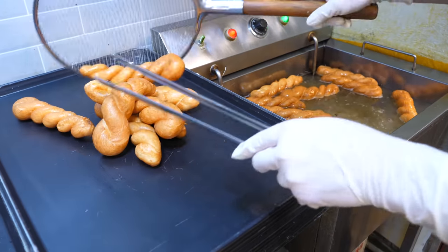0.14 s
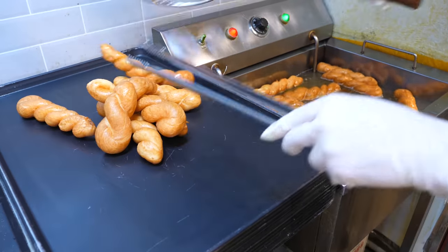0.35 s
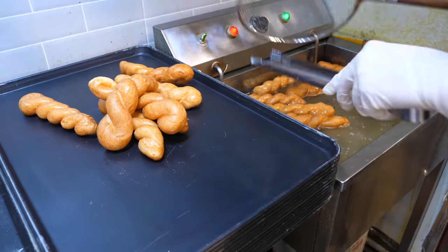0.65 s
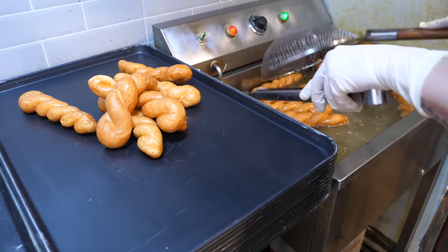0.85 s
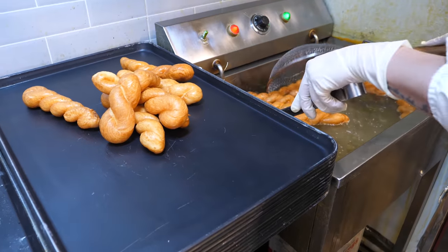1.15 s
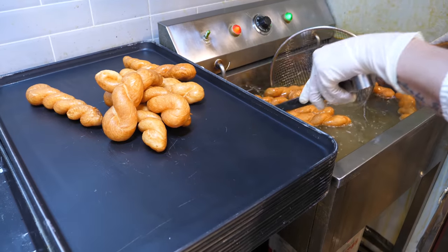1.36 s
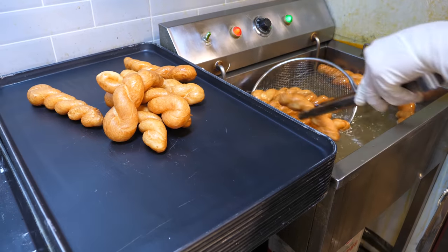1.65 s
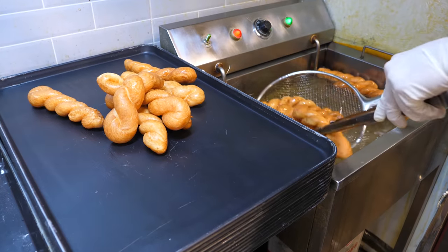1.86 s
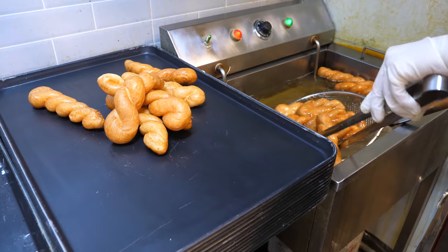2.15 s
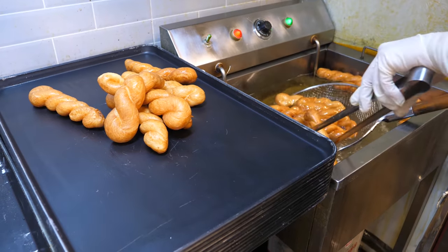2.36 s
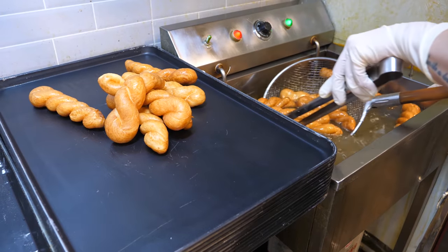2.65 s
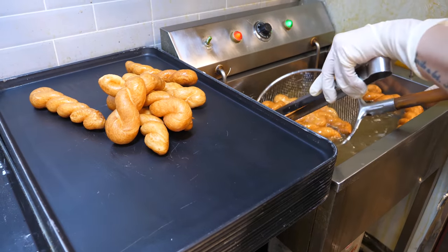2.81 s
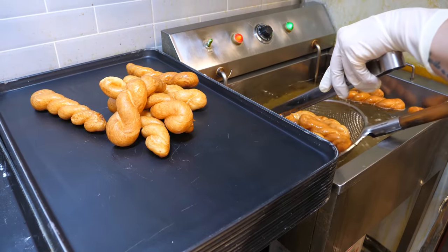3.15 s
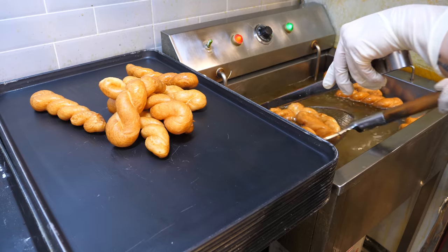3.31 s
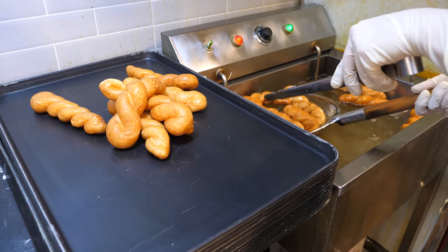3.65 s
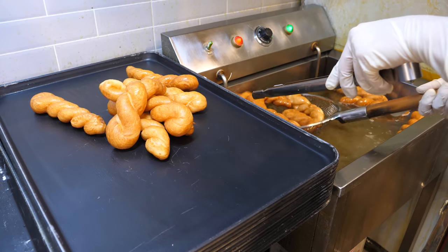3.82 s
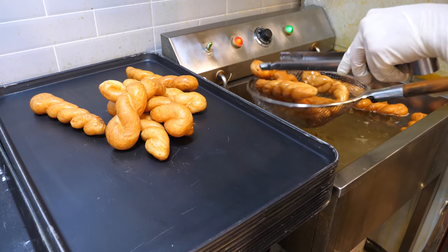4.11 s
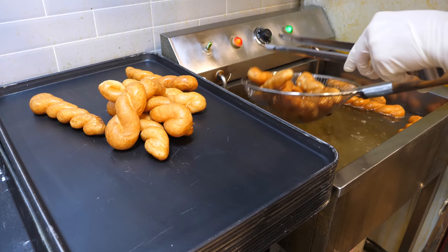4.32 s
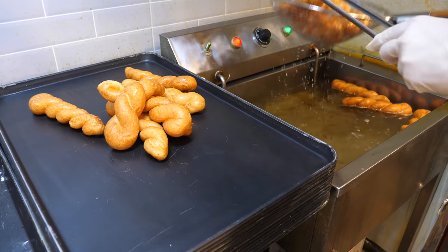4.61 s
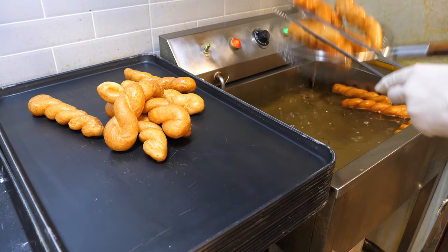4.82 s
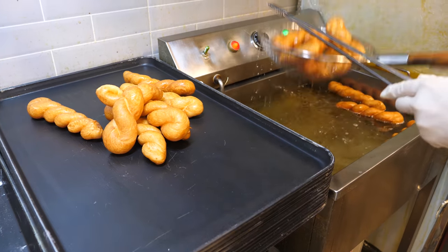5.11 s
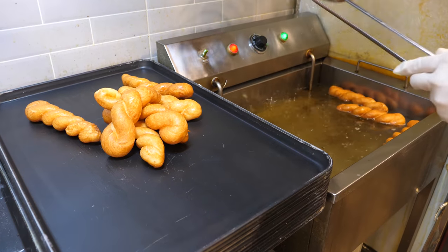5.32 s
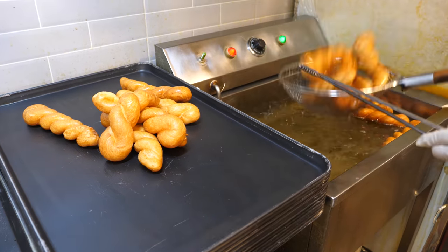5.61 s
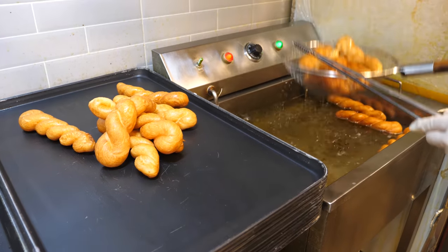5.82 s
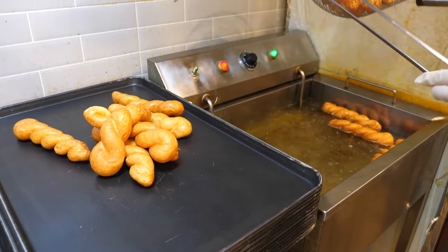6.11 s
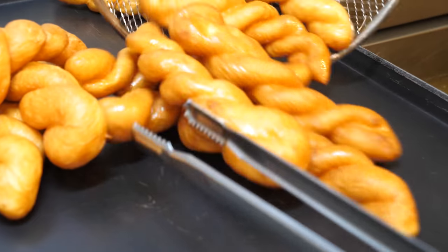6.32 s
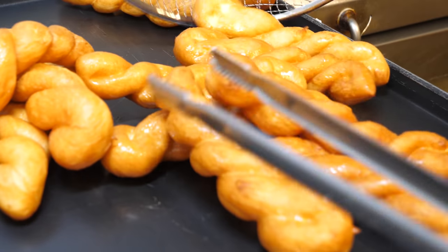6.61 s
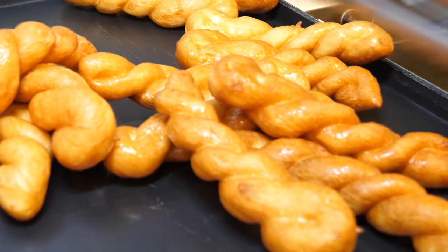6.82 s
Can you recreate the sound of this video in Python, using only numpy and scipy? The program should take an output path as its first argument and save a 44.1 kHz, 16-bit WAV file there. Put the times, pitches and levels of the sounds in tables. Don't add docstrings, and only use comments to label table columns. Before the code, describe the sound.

Close in a small tiled kitchen, an extractor fan hums, whines and rattles while its draught thumps the microphone, most violently just after one second. A wire strainer knocks trays, then scrapes and rings against a steel fryer as dough is scooped. Tongs clink sharply, dough rustles when tossed, then tips onto a tray with quick thuds in a closer shot.

```python
import sys
import numpy as np
from scipy import signal
from scipy.fft import rfft, irfft, next_fast_len
from scipy.io import wavfile
from scipy.ndimage import uniform_filter1d, map_coordinates

SR = 44100
rng = np.random.default_rng(int(sys.argv[2]) if len(sys.argv) > 2 else 0)


def digitize_waveform(pressure):
    field = np.atleast_2d(pressure).T
    bounded = np.clip(field, -1, 1)
    quanta = np.round(bounded * 32767).astype(np.int16)
    wavfile.write(sys.argv[1], SR, quanta)


def to_linear_factor(level_db):
    exponent = np.asarray(level_db, float) / 20
    return 10 ** exponent


N = 306936
EDIT_S = 6.2232


def unit(x):
    return x / np.sqrt(np.mean(x ** 2) + 1e-20)


def along(points, hz):
    f, v = np.transpose(points)
    return np.interp(np.log(hz + 1), np.log(f + 1), v)


def curves(rows):
    s, *cols = np.transpose(rows)
    return [np.interp(np.arange(N) / SR, s, c) for c in cols]


def swells(rows):
    t = np.arange(N) / SR
    power = 0
    for s, rise_s, fall_s, db in rows:
        power = power + to_linear_factor(2 * db) * np.exp(-((t - s) / np.where(t < s, rise_s, fall_s)) ** 2)
    return np.sqrt(power)


def wobble(rate_hz, size=N):
    knots = rng.standard_normal(int(size * rate_hz / SR) + 4)
    return map_coordinates(knots, [np.arange(size) * rate_hz / SR])


def filtered(x, response):
    m = next_fast_len(N + SR // 2)
    return unit(irfft(rfft(x, m) * response(np.fft.rfftfreq(m, 1 / SR)), m)[:N])


def noise(response):
    return filtered(rng.standard_normal(N), response)


def colour(points):
    return lambda hz: to_linear_factor(along(points, hz))


def resonant(peaks):
    def response(f):
        total = 0
        for k, (c, w, db) in enumerate(peaks):
            total = total + (-1) ** k * to_linear_factor(db) * 1j * f * w / (c * c - f * f + 1j * f * w)
        return total
    return response


def grit(rate_hz, spread_db):
    touch = rng.random(N) < rate_hz / SR
    size = to_linear_factor(spread_db * np.minimum(rng.exponential(size=N), 3))
    return rng.standard_normal(N) * (0.18 + touch * size)


def strike(spectrum, modes, t60_s, ring_db, soften, chatter_db, crack_db, attack_s, dull_hz=9000):
    t = np.arange(SR // 2) / SR
    hz, frame_s, z = signal.stft(rng.standard_normal(len(t)), SR, nperseg=128)
    life_s = t60_s * (np.maximum(hz, 300) / 1000) ** -soften / (1 + (hz / dull_hz) ** 2)
    fade = to_linear_factor(-60 * frame_s / life_s[:, None]) + to_linear_factor(crack_db - 60 * frame_s / 0.0072)
    z = z * fade * to_linear_factor(along(spectrum, hz))[:, None]
    clatter = signal.istft(z, SR, nperseg=128)[1][:len(t)]
    clatter = clatter / np.sqrt(np.mean(clatter[:400] ** 2))
    ring = 0
    for k, (mode_hz, db, mode_t60_s) in enumerate(modes):
        level_db = db - 60 * t / mode_t60_s + chatter_db * wobble(119.5, size=len(t))
        ring = ring + (-1) ** k * to_linear_factor(level_db) * np.sin(2 * np.pi * mode_hz * t)
    return (clatter + to_linear_factor(ring_db) * ring) * (1 - np.exp(-t / attack_s)) / 3


def whine(turns, orders, levels_db, shade_db):
    throb_db = 3.0 * np.cos(2 * np.pi * (turns - .25))
    total = 0
    for k, db in zip(orders, levels_db):
        level_db = db + 2.5 + shade_db(k) + throb_db * (130 < k < 300) + 1.96 * wobble(2.64)
        total = total + to_linear_factor(level_db) * np.cos(2 * np.pi * (k * turns + .19 * k ** 2))
    return total


def fan():
    # (time [s], fan rush level [dB])
    rush_gain = [(0.0, -41), (0.27, -46), (1.01, -40.5), (1.2, -48.5), (1.43, -45), (1.66, -41.5),
                 (2.11, -40.5), (2.29, -42), (2.54, -47), (2.77, -48), (3.31, -40.5), (3.51, -44),
                 (3.68, -43), (4.9, -34.5), (5.14, -37.5), (5.72, -38.5), (6.75, -35), (6.96, -34)]
    # (time [s], speed [turns/s])
    shaft_speed = [(0, 22.07), (.65, 22.03), (1.05, 22.0), (1.85, 21.966), (3.05, 21.962), (3.85, 21.935),
                   (4.65, 21.936), (5.05, 21.963), (6.22, 22.0), (6.23, 22.128)]
    # (frequency [Hz], level [dB/Hz])
    rush_spectrum = [(24, -29), (40, -2), (127, 0), (275, -10.5), (1370, -22), (1610, -26), (1800, -22),
                     (2020, -28), (2900, -27.5), (3720, -31), (5110, -30), (5850, -34), (9000, -50),
                     (11700, -52), (19800, -120)]
    # (frequency [Hz], width [Hz], level [dB])
    housing = [(57, 8.2, -5), (120.9, 7.7, 3.5), (175, 5.7, -1.5), (243.7, 14.7, -9)]
    # (frequency [Hz], width [Hz], level [dB])
    cage = [(1130, 110, -14), (1310, 63, -5.5), (1780, 120, 0), (2447, 92, 2.5), (2866, 210, 0.5),
            (3450, 310, -4.5), (3900, 130, -4), (4540, 380, -2.5), (5400, 88, -4.5), (5850, 390, -17.5),
            (7160, 450, -9)]
    # (frequency [Hz], level [dB/Hz])
    hiss_spectrum = [(6300, -22), (7200, 1), (7800, 5), (8500, 5.5), (9300, -0.5), (12000, -2),
                     (14200, -3.5), (16000, -9)]
    # (time [s], 80th order level [dB], level of orders above 200 [dB])
    arm_shade = [(0, 0, -7), (1, 1, 0), (2.5, 3, 0.5), (4.9, -3, 2), (5.15, 7.5, 0.5), (6.2, 6.5, 0)]
    far_orders = [8, 32, 48, 61, 78, 79, 80, 81, 83, 84, 100, 111, 112, 128, 131, 132, 133, 134, 135, 136,
                  144, 152, 160, 180, 212, 228, 232, 235, 236, 237, 238, 330]
    far_levels = [-44, -54.5, -52, -56.5, -61, -61, -54, -59, -54.5, -62, -55.5, -60, -58, -67, -59.5,
                  -50.5, -54.5, -63, -64, -63, -60, -60, -70, -61, -70, -68, -62, -60, -56.5, -70, -55.5,
                  -66]
    near_orders = [8, 58, 80, 81, 82, 111, 112, 125, 128, 132, 144, 196, 212, 234, 236, 237, 238, 330]
    near_levels = [-52, -47, -55, -51, -61, -45, -41.5, -55, -48, -40, -63, -53, -65, -52, -51, -57, -63,
                   -66]
    # (time [s], level [dB])
    near_rise = [(6.22, -12), (6.26, -12), (6.45, -2), (6.7, -2.5)]

    rush_db = curves(rush_gain)[0] - 3
    duck_db = rush_db + 44
    hum_db = -35.5 + 0.97 * duck_db + 1.66 * wobble(3.54)
    hiss_db = -54.5 + 0.99 * duck_db

    near = np.arange(N) > EDIT_S * SR
    turns = np.cumsum(curves(shaft_speed)[0]) / SR
    turns -= np.where(near, turns[round(6.617 * SR)], turns[round(4.304 * SR)])

    steps = np.arange(2048)
    patterns = rng.standard_normal((3, len(steps))) * to_linear_factor(-7 * steps / len(steps))
    rattle = 0
    for pattern in patterns:
        rattle = rattle + to_linear_factor(2.0 * wobble(1.185)) * np.interp(turns % 1 * len(steps), steps, pattern)
    rattle = filtered(rattle, resonant(cage))

    low_db, high_db = curves(arm_shade)

    def shade_db(k):
        if k == 80:
            return low_db
        return high_db if k > 200 else 0

    far_whine = whine(turns, far_orders, far_levels, shade_db)
    near_whine = whine(turns, near_orders, near_levels, lambda k: 0)
    near_whine = near_whine * to_linear_factor(curves(near_rise)[0] - 2.0)
    whines = to_linear_factor(42.5) * np.where(near, near_whine, far_whine)

    rush = to_linear_factor(12.5 + 0.2 * wobble(6.2)) * noise(colour(rush_spectrum))
    hum = noise(resonant(housing)) + 0.5 * np.sin(2 * np.pi * 140.0 * np.arange(N) / SR)
    air = to_linear_factor(rush_db) * (rush + to_linear_factor(-1.0) * rattle + whines)
    return air + to_linear_factor(hum_db) * hum + to_linear_factor(hiss_db) * noise(colour(hiss_spectrum))


def draught():
    # (frequency [Hz], level [dB/Hz])
    push_spectrum = [(1, 4.5), (4, 20.5), (16, 10.5), (26, -3), (50, -49), (200, -130)]
    # (frequency [Hz], level [dB/Hz])
    flutter_spectrum = [(10, -9), (22, -0.5), (55, -8.5), (92, -22.5), (200, -34), (600, -130)]
    # (peak [s], rise [s], fall [s], push level [dB], flutter above it [dB])
    gusts = [(0.02, 0.04, 0.036, -14, -6.5), (0.16, 0.026, 0.097, -10, -3.5), (0.6, 0.18, 0.36, -17.5, -21),
             (1.17, 0.047, 0.082, 5.5, -11.5), (1.4, 0.11, 0.082, -8.5, -15),
             (1.68, 0.11, 0.061, -15.5, -26), (1.86, 0.041, 0.034, -11, -11), (1.97, 0.035, 0.015, -5, -25),
             (2.35, 0.034, 0.05, -0.5, -19), (2.57, 0.083, 0.056, -3.5, -8), (2.74, 0.035, 0.028, -3.5, -5),
             (2.85, 0.038, 0.068, -4.5, -16), (3.03, 0.024, 0.031, -9, -7), (3.44, 0.061, 0.08, -8, -3),
             (3.9, 0.025, 0.077, -19, -4.5), (4.46, 0.038, 0.035, -17, -10),
             (4.88, 0.076, 0.09, -13.5, -13), (5.07, 0.034, 0.046, -4, -3.5), (5.2, .05, 0.12, -13, -2.5),
             (5.58, 0.031, 0.083, -4, -15.5), (5.82, 0.077, 0.058, -13, -3.5),
             (6.18, 0.099, 0.095, -10.5, -18), (6.78, 0.044, 0.086, -12, -33)]
    # (peak [s], period [s], width [s], height [full scale])
    surge_lump = (1.1968, 0.096, 0.075, 1.1)
    # (peak [s], width [s], level [dB])
    cut_lump = (6.21, 0.057, -16)

    push = noise(colour(push_spectrum))
    push = push / np.sqrt(np.abs(uniform_filter1d(push ** 2, SR // 8)) + 0.1)
    flutter = to_linear_factor(1.85 * wobble(12)) * noise(colour(flutter_spectrum))
    push_gain = np.hypot(swells([row[:4] for row in gusts]), to_linear_factor(-25.5))
    flutter_rows = [(s, rise, fall, db + above_db) for s, rise, fall, db, above_db in gusts]
    flutter = np.hypot(swells(flutter_rows), to_linear_factor(-42)) * flutter
    lumps = push_gain * push + flutter

    s, period_s, width_s, height = surge_lump
    u = np.arange(N) / SR - s
    swamped = np.exp(-(u / .11) ** 4)
    crest = np.exp(-(u / .015) ** 2)
    lumps = (1 - swamped) * lumps + swamped * (1 - crest) * .2 * np.tanh(2.5 * flutter)
    surge = height * np.exp(-(u / width_s) ** 2) * np.cos(2 * np.pi * u / period_s)
    s, width_s, db = cut_lump
    return to_linear_factor(-1.5) * lumps + surge + swells([(s, width_s, width_s, db)])


def knocks():
    # (time [s], peak near 500 Hz [dB], level above it near 1.6 kHz [dB], near 4.5 kHz [dB], t60 [s])
    hits = [(0.175, -13, -14, -13.5, 0.28), (0.53, -20.5, -21, -23, 0.28), (1.160, -24, -9, -10, 0.28),
            (1.517, -13, -21, -16, 0.29), (2.186, -9, -13, -26.5, 0.24), (3.148, -11.5, -6.5, -17, 0.23),
            (3.692, -22, -23, -36, 0.21), (4.986, -15, -10, -13, 0.28), (5.689, -22.5, -8, -10, 0.48),
            (6.31, -17.5, -14, -30, 0.28), (6.343, -8, -13.5, -26, 0.2), (6.445, -18, -22, -27, 0.062),
            (6.537, -21.5, -10, -17, 0.19), (6.561, -13.5, -20, -21, 0.28), (6.673, -18, -17, -24.5, 0.11)]
    # (frequency [Hz], level [dB], t60 [s])
    edge_modes = [
        [(279.5, 1.5, 0.21), (752, -0.5, 0.32), (980, -13.5, 0.53), (1116, -13, 0.19), (1750, -8, 0.26),
         (2120, -12, 0.18), (2610, -16, 0.22), (3117, -20, 0.29), (3350, -16, 0.26), (3480, -17.5, 0.27)],
        [(720, 3, 0.079), (423, 3, 0.041), (740, -0.5, 0.29), (980, -21, .3), (1728, -12, .15),
         (2450, -11, 0.065)],
    ]
    # (frequency [Hz], level [dB], t60 [s])
    wall_modes = [
        [(2200, 1, 0.057), (2070, -2, 0.069)],
        [(327, 2.5, 0.56), (353, 6.5, 0.44), (531, -7, 0.3), (580, -6, .17), (679, -0.5, 0.28),
         (1072, -7, 0.29), (1514, -11.5, 0.26), (1915, -10.5, 0.24), (2580, -5, .07), (2870, -10.5, 0.2)],
        [(286, -14, 0.2), (334, -1, 0.29), (380, 3, 0.3), (583, 1, 0.32), (753, -1.5, 0.25), (1077, -15, 0.28),
         (1370, -14, 0.24), (1640, -16, 0.17), (1850, -4, 0.093), (1940, -8, .08), (2520, -18, 0.13)],
        [(322, -2.5, 0.34), (556, -9, 1), (385, -1, 0.16), (700, -2.5, 0.082), (1063, -24, .3),
         (1470, -12.5, 0.4), (1735, -28, 0.3), (2200, -23, .15)],
        [(336.6, 3, 0.27), (403, -3, 0.24), (590, -20, 0.12)],
        [(352, 2.5, 0.14)],
        [(895, -2, 0.12), (633, -1.4, 0.17)],
    ]
    # (frequency [Hz], level [dB], t60 [s])
    floor_modes = [
        [(440, 2.9, 0.11)],
        [(174, 1.5, 0.2), (294, 6, 0.091), (443, -11.5, 0.19), (758, -6.5, 0.25), (1130, -0.5, 0.16),
         (1480, -10, 0.075), (1980, -10, 0.082)],
        [(720, -2, 0.081)],
        [(1600, 3, 0.025)],
        [(292, 2.5, 0.15), (455, -14, 0.23)],
        [(1010, 3, 0.022)],
    ]

    out = np.zeros(N + SR)
    for (s, db, mid_db, high_db, t60_s), modes in zip(hits, edge_modes + wall_modes + floor_modes):
        spectrum = [(120, -29), (300, 1.5), (700, -6.0), (1600, mid_db + 7.0),
                    (4500, high_db), (10000, high_db - 14.5), (16000, high_db - 20)]
        hit = strike(spectrum, modes, t60_s, ring_db=0.5, soften=0.13, chatter_db=2.0,
                     crack_db=-3.0, attack_s=0.00058)
        out[round(s * SR):][:SR // 2] += to_linear_factor(db + 1.0) * hit
    return out[:N]


def tongs():
    # (time [s], peak near 8 kHz [dB], level above it near 1.6 kHz [dB], near 5 kHz [dB], t60 [s])
    clinks = [(0.423, -34, 7, -10, 0.083), (0.467, -38, 13, 12, 0.058), (0.531, -40, 0, 0, 0.06),
              (1.0803, -20.5, -3, -2, 0.23), (1.089, -28, 9, -1, 0.1), (1.099, -28, 6, 5, 0.44),
              (1.108, -30, 9.5, 2, 0.12), (1.148, -34, 9, 10, 0.18), (3.194, -38, 10, 9, 0.08),
              (3.218, -43, 10, 8, 0.06), (3.308, -37, 11, 8, 0.091), (3.2365, -35.5, 6, -8, 0.12),
              (3.979, -33, 6, -10, 0.12), (5.077, -28, -6, -12, 0.07), (5.126, -21, -25, -6, 0.27),
              (5.146, -32, -20, -10, 0.12), (5.5271, -9.5, -12.5, -2, 0.26), (5.756, -34, 5, -5, 0.12),
              (6.26, -24, 6, 16, 0.07), (6.2916, -26, -3, -8, 0.096), (6.331, -30, 0, 0, 0.07),
              (6.339, -29, 1, -5, 0.082), (6.5657, -21, -6, 5, 0.12), (6.582, -33, 0, 3, 0.06)]
    # (frequency [Hz], level [dB], t60 [s])
    hoop = [(1250, 5, .1), (1700, 3, .07), (4100, 1, .05), (5250, 1, .13), (7181, -1, .08), (8100, 1, .06),
            (8893, -6, .08), (10010, 2, .08), (11390, 4, .05), (12790, 2, .06)]
    # (frequency [Hz], level [dB], t60 [s])
    arms = [(3350, 10, 0.046), (4880, 3.5, 0.12), (5400, -18, .18), (6180, -13, 0.2), (6600, -9, 0.14),
            (6990, -8, 0.15), (7200, -6, 0.15), (8000, -2, .073), (9600, -13, .1), (10380, -14, 0.15),
            (11300, 7, 0.038), (12400, -1, .04), (13000, 3.5, 0.033), (14210, 6, .06)]
    lift_s = 4

    out = np.zeros(N + SR)
    for s, db, low_db, mid_db, t60_s in clinks:
        spectrum = [(700, low_db - 7), (1600, low_db + 2.0), (2800, low_db + 3.5), (5000, mid_db),
                    (8000, 6.5), (10100, -4.5), (12500, 3 if lift_s < s < EDIT_S else -3),
                    (14800, -4), (16000, -16)]
        firm_db = -14 if s > EDIT_S else 1.2 * min(2 * (s < lift_s), db + 28)
        modes = []
        for hz, level_db, life_s in (hoop if s < lift_s else arms):
            level_db = level_db + firm_db + along(spectrum, hz) + rng.normal(0, 1.2)
            modes.append((hz * rng.normal(1, .004), level_db, min(life_s, t60_s)))
        for place, u, v in rng.random((40, 3)):
            hz = 3300 + 12000 * place
            life_s = t60_s * (0.5 + 0.5 * v) * min(1, 7500 / hz)
            modes.append((hz, along(spectrum, hz) - 11 - 6 * u, life_s))
        clink = strike(spectrum, modes, t60_s, ring_db=-7.5, soften=0.29, chatter_db=4.0,
                       crack_db=0, attack_s=0.00021, dull_hz=40000)
        out[round(s * SR):][:SR // 2] += to_linear_factor(db) * clink
    return out[:N]


def rebounds():
    # (time [s], peak [dB], pitch woken most [Hz], wire rattle above it [dB])
    skids = [(0.923, -25, 350, -8), (0.977, -24.5, 342, -10), (1.429, -23, 700, -8), (1.565, -12, 334, -14),
             (1.62, -24, 352, -5), (1.655, -20, 316, -15), (1.754, -24, 700, -15), (1.805, -14, 348, -16),
             (1.925, -21, 755, -9), (2.032, -28, 331, -16), (2.222, -17, 385, -19), (2.258, -17, 385, -14),
             (2.312, -22, 500, -14), (2.807, -32, 493, -10), (3.158, -12.5, 700, -6),
             (3.18, -10.5, 549, -10), (3.195, -10.5, 500, -2), (3.224, -13, 552, -14),
             (3.308, -18, 544, -1), (4.121, -31, 680, -6.5), (4.205, -25, 514, -6)]
    # (frequency [Hz], level [dB], t60 [s])
    wall_ring = [(334, 4, 0.26), (385, -5.5, 0.42), (440, -10, .25), (502, -9, 0.25), (550.4, -1.5, 0.5),
                 (626, -2, .3), (739, -1.5, 0.27), (940, -12, .3), (1097, -14, .2), (1420, -6, .25),
                 (1739, -20, .25)]

    out = np.zeros(N + SR)
    for s, db, pitch_hz, rattle_db in skids:
        modes = [(hz, level_db - 10 * abs(np.log2(hz / pitch_hz)), life_s)
                 for hz, level_db, life_s in wall_ring]
        spectrum = [(120, -30), (350, 4.0), (800, -5), (1600, rattle_db),
                    (4500, rattle_db - 10), (16000, rattle_db - 48)]
        skid = strike(spectrum, modes, 0.21, ring_db=0.5, soften=0.33, chatter_db=3.0,
                      crack_db=-12, attack_s=0.0027)
        out[round((s - .002) * SR):][:SR // 2] += to_linear_factor(db - 5.0) * skid
    return out[:N]


def scooping():
    # (peak [s], rise [s], fall [s], level [dB])
    strokes = [
        (1.1, 0.1, 0.091, -38.5),
        (1.6, 0.093, 0.32, -30),
        (2.15, 0.13, 0.28, -37),
        (2.82, 0.038, 0.31, -37.5),
        (3.3, 0.27, 0.33, -31.5),
        (3.71, 0.022, 0.05, -37),
        (4.27, 0.085, 0.056, -46),
    ]
    # (peak [s], rise [s], fall [s], level [dB], fizz above it [dB])
    tosses = [
        (5.005, 0.047, 0.046, -30.5, -1),
        (5.7, 0.012, 0.039, -31, -3),
        (5.855, 0.021, 0.033, -38.5, -21),
        (6.262, 0.0058, 0.025, -27.5, -19),
        (6.338, 0.006, 0.015, -32, -5),
        (6.42, 0.039, 0.16, -32, -11),
        (6.579, 0.067, .1, -45, -12),
    ]
    # (frequency [Hz], width [Hz], level [dB])
    vat = [(341.4, 68, 5.5), (414, 140, 1), (537, 66, -0.5), (715, 33, -2), (1100, 650, -13),
           (1860, 2830, -22.5)]
    # (frequency [Hz], level [dB/Hz])
    crust_spectrum = [(120, -19), (200, -20), (353, -4.5), (504, -7.5), (762, -5), (971, -6.5), (6000, -29),
                      (7800, -70), (13200, -120)]
    # (frequency [Hz], level [dB/Hz])
    mesh_spectrum = [(2350, -9.5), (4000, -7.5), (5040, -8.5), (7880, -12.5), (9010, -15), (14500, -23),
                     (16000, -29)]

    slosh = filtered(grit(rate_hz=1100, spread_db=2.0), resonant(vat))
    slosh = swells(strokes) * to_linear_factor(3.7 * wobble(14)) * slosh
    crust = filtered(grit(rate_hz=2300, spread_db=2.5), colour(crust_spectrum))
    crust = swells([row[:4] for row in tosses]) * crust
    fizz = filtered(grit(rate_hz=5800, spread_db=-2.5), colour(mesh_spectrum))
    fizz_rows = [(s, rise, fall, db + above_db) for s, rise, fall, db, above_db in tosses]
    return slosh + crust + swells(fizz_rows) * fizz


def rim_touch():
    # (time [s], peak [dB], t60 [s])
    touch = (2.4294, -30.5, 0.55)
    # (frequency [Hz], level [dB], t60 [s])
    rim_modes = [(3770, -5, 0.045), (4350, -4, .2), (4760, -3, .15), (5233, -3, .13), (5600, 2, .17),
                 (6115, -8, .12), (7100, -2, 0.13), (7660, 0, 0.15), (8123, -5, .09), (8700, -8, .08),
                 (13090, -3.5, .06), (15270, -9.5, .06)]

    s, db, t60_s = touch
    spectrum = [(2500, -35), (3800, -3), (6000, -4), (8500, -6), (10000, -12), (16000, -14)]
    out = np.zeros(N)
    out[round(s * SR):][:SR // 2] = to_linear_factor(db) * strike(
        spectrum, rim_modes, t60_s, ring_db=-2.5, soften=0.18, chatter_db=2.0,
        crack_db=-10, attack_s=.0006)
    return out


def bubble():
    # (time [s], peak [dB], frequency [Hz], life [s])
    pop = (4.296, -33, 800, .03)
    s, db, hz, life_s = pop
    u = np.maximum(np.arange(N) / SR - s, 0) / life_s
    envelope = 3 * u * np.exp(-3 * u) * np.e * (u < 3)
    return to_linear_factor(db) * envelope * np.sin(2 * np.pi * hz * life_s * (u + 0.147 * u ** 2))


def scene():
    air = fan() + draught()
    metal = knocks() + tongs() + rebounds() + rim_touch()
    return (air + metal + scooping() + bubble())[None]


def roll_off(x):
    return signal.sosfilt(signal.butter(12, 16450, fs=SR, output="sos"), x)


def record(dry):
    return_s = 6.2595
    gap_s = [EDIT_S, EDIT_S + 1 / SR, return_s - .001, return_s, return_s + 0.057]
    gap = to_linear_factor(np.interp(np.arange(N) / SR, gap_s, [0, -6, -9.0, -5.5, -1.5]))
    band = signal.ellip(8, .5, 40, 15750, fs=SR, output="sos")
    mix = np.clip(signal.sosfilt(band, dry) * gap - .002, -1, 1)
    return roll_off(mix)


dry = scene()
out = record(dry)
digitize_waveform(out)
```